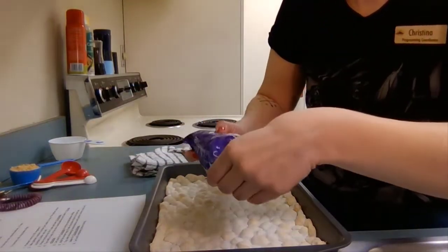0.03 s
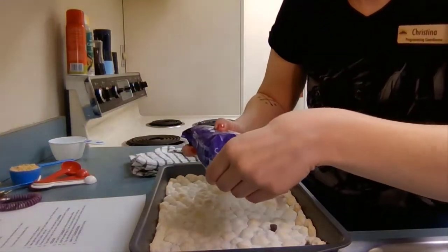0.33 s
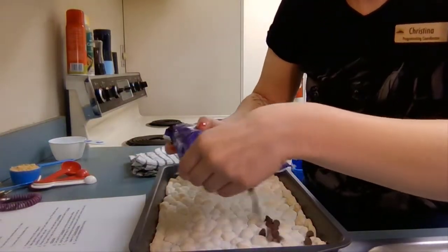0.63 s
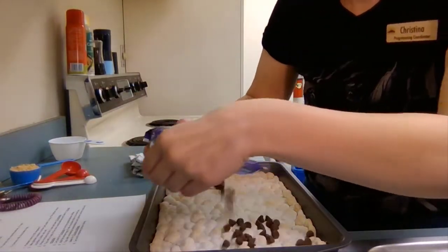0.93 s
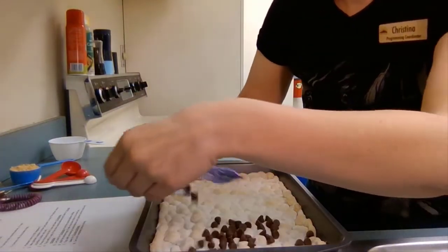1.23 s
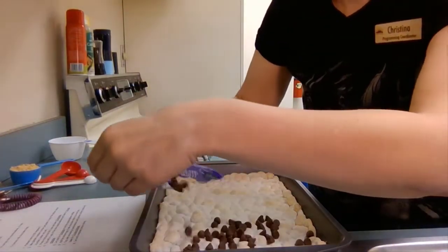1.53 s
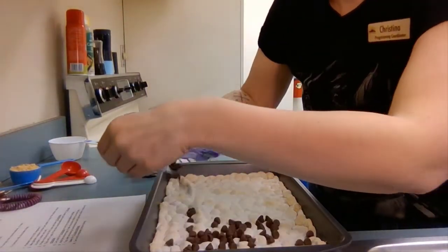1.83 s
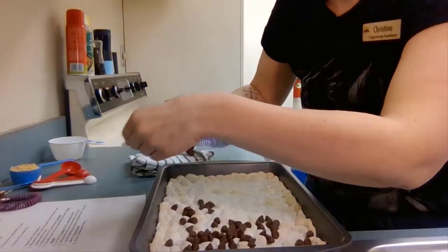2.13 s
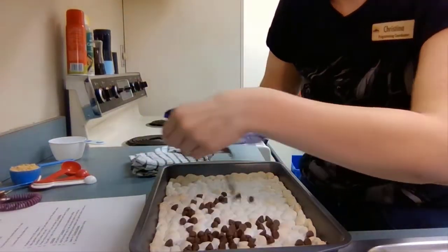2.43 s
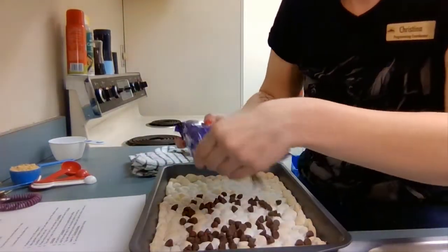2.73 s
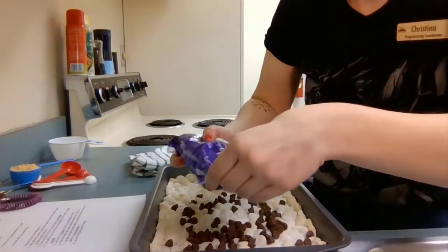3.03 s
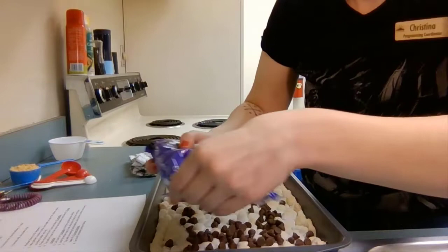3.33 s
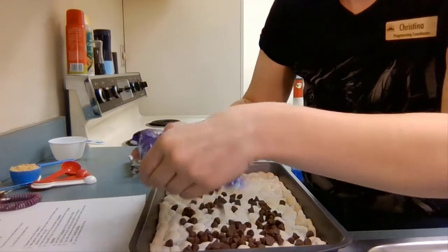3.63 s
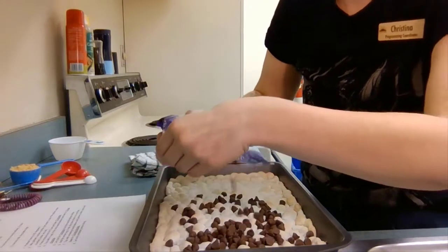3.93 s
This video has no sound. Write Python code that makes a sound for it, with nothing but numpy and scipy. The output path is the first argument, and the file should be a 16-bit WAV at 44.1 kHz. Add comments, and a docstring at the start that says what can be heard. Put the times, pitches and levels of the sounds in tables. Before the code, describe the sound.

Small chocolate chips tap dully onto food in a metal pan, with plastic bag crinkling.

```python
"""Chocolate chips, sprinkled by hand from a plastic bag, land on a metal pan of soft food. Each chip gives a
dull tap and a tick, and briefly rings the pan. The bag crackles sharply at first as its creases buckle, then
rustles faintly. Heard close up in a small kitchen, on a small microphone thin in the bass and the top. The
whole sound dips briefly now and then."""
import sys
import numpy as np
from scipy import signal
from scipy.fft import rfft, irfft
from scipy.io import wavfile
from scipy.ndimage import uniform_filter1d

SR = 44100
rng = np.random.default_rng(int(sys.argv[2]) if len(sys.argv) > 2 else 0)


def master_out(mix):
    """Clip the mix to full scale and print it as 16-bit PCM to the path in sys.argv[1]."""
    frames = np.transpose(np.atleast_2d(mix))
    ceiling = np.clip(frames, -1, 1)
    pcm = np.round(ceiling * 32767).astype(np.int16)
    wavfile.write(sys.argv[1], SR, pcm)


N = 176400
BAND_LIMIT_HZ = 9000


def amp(db):
    """Decibels to gain."""
    return 10 ** (np.asarray(db) / 20)


def unit_rms(x):
    """Scales to rms 1."""
    return x / np.sqrt(np.mean(x ** 2) + 1e-20)


def curve_at(points, hz):
    """Reads a table on a log-frequency axis."""
    points_hz, values = np.transpose(points)
    return np.interp(np.log(hz + 1), np.log(points_hz + 1), values)


def add(mix, start_s, sound):
    """Mixes a sound in at a time."""
    part = mix[round(start_s * SR):][:len(sound)]
    part += sound[:len(part)]


def colour(x, spectrum, size=4096):
    """Minimum-phase filter of unit energy with the given spectrum, falling above the band limit."""
    hz = np.fft.rfftfreq(size, 1 / SR)
    gain_db = curve_at(spectrum, hz) - 30 * np.clip(hz / BAND_LIMIT_HZ - 1, 0, 1)
    cepstrum = irfft(np.log(amp(gain_db)))
    causal = 2 * cepstrum * (np.arange(size) < size // 2)
    taps = irfft(np.exp(rfft(causal)))
    return signal.oaconvolve(x, taps / np.linalg.norm(taps))[:len(x)]


def ring(modes, t, scatter_db=2.5, detune=.012):
    """Dying modes, a little different in level and pitch each time."""
    sound = np.zeros(len(t))
    for hz, db, t60_s in modes:
        envelope = amp(db + scatter_db * rng.standard_normal() - 60 * t / t60_s)
        pitch_hz = hz * (1 + detune * rng.standard_normal())
        sound += envelope * np.sin(2 * np.pi * pitch_hz * t)
    return sound


def clicks(per_s, spread_db):
    """Random clicks of uneven size."""
    sizes = amp(spread_db * np.minimum(rng.exponential(1, N), 3.2))
    signs = rng.choice([-1., 1.], N)
    return unit_rms(sizes * signs * (rng.random(N) < per_s / SR))


# Relative levels of the bag and the handful as the hands move: time_s, crackle_db, rub_db
HAND_MOVES = [(0, -36.5, -37.5), (.06, -59, -54.5), (0.092, -45.5, -42), (0.119, -52.5, -39),
              (.16, -52, -55), (.21, -58, -40), (.25, -58, -53.5), (0.293, -47.5, -48.5),
              (0.344, -67.5, -52.5), (0.387, -68, -74), (0.437, -54, -50.5), (0.494, -74.5, -60.5),
              (0.545, -51.5, -42), (0.618, -64, -76), (.72, -65.5, -67.5), (0.952, -69, -59),
              (1.301, -75, -76), (1.421, -77, -67.5), (1.476, -63, -61), (1.484, -60, -56.5),
              (1.523, -55, -47.5), (1.58, -73.5, -67), (1.629, -75, -75), (1.677, -66.5, -65),
              (1.78, -87.5, -77.5), (1.91, -68.5, -63.5), (2.05, -73.5, -75), (2.13, -69, -62.5),
              (2.2, -84.5, -72), (2.309, -75.5, -65.5), (2.488, -63.5, -63.5), (2.65, -78.5, -66),
              (2.771, -76.5, -85.5), (3.05, -73, -62.5), (3.119, -77, -73), (3.191, -70, -64.5),
              (3.31, -82.5, -74.5), (3.632, -68.5, -62.5), (3.719, -74, -73), (3.781, -70, -61.5),
              (4, -73, -69)]
# Colours of the crackling film and the rubbing chips: frequency_hz, gain_db
CRACKLE_SPECTRUM = [(200, -21.5), (1000, 8), (1400, 5), (1850, -1.5), (2050, -2), (2450, 2.5), (3000, -3),
                    (4300, -1), (5000, -3), (5800, -2.5), (6700, 2.5), (8000, -10.5)]
RUB_SPECTRUM = [(30, -31.5), (60, -21.5), (105, -3), (150, -16.5), (230, -9), (290, -7), (375, 6),
                (480, -13.5), (620, -5.5), (760, 1), (880, -9), (1050, -4.5), (1400, -15), (3000, -36)]


def crackle_and_rub():
    """Small creases crackle in clumps and chips rub dully, following the hands."""
    time_s, crackle_db, rub_db = np.transpose(HAND_MOVES)
    t = np.arange(N) / SR
    flicker = unit_rms(uniform_filter1d(rng.standard_normal(N), round(.009 * SR)))
    clumps = unit_rms(amp(3 * flicker))
    crackle = colour(clumps * clicks(per_s=600, spread_db=3), CRACKLE_SPECTRUM)
    rub = colour(clumps * clicks(per_s=220, spread_db=4), RUB_SPECTRUM)
    crackle *= amp(np.interp(t, time_s, crackle_db) - 3.5)
    rub *= amp(np.interp(t, time_s, rub_db) + 2.5)
    return crackle, rub


# Modes of the hollow plastic bag: pitch_hz, level_db, t60_s
BAG_MODES = [(1834, -2.5, .05), (1900, -3.5, 0.039), (2304, -3, .03), (2633, -4, 0.014), (3472, -2.5, .03),
             (3634, -3.5, 0.043), (4270, 1.5, 0.015), (4742, -4.5, 0.034), (5520, -7, .02),
             (5933, -3.5, .018), (6530, -9, 0.023)]


def hollow_bag(cracks, bend_s=.2, ring_db=-4.5):
    """Every crack rings the hollow bag, whose modes wander as the hand bends it."""
    t, ringing = np.arange(N) / SR, np.zeros(N)
    for centre_s in np.arange(0, N / SR + bend_s, bend_s):
        response = ring(BAG_MODES, t[:SR // 10])
        crossfade = np.clip(1 - abs(t - centre_s) / bend_s, 0, 1)
        ringing += signal.oaconvolve(cracks * crossfade, response / np.linalg.norm(response))[:N]
    return cracks + amp(ring_db) * ringing


# Colour of the kitchen's background: frequency_hz, gain_db
ROOM_TONE_SPECTRUM = [(20, -25.5), (50, -11.5), (90, -7), (115, 6), (160, -3), (370, -4.5), (500, -13.5),
                      (730, 0), (1300, -23), (3000, -21.5), (6500, -24), (9000, -32.5)]


def room_tone():
    """Faint, low noise of the room behind the pan."""
    return amp(-73) * colour(rng.standard_normal(N), ROOM_TONE_SPECTRUM)


# Single creases of the bag snapping: start_s, level_db, pitch_hz, settle_s
CREASES = [(.0095, -25, 5770, 0.0058), (0.0158, -29.5, 1790, 0.017), (0.0647, -46.5, 1830, 0.003),
           (0.0786, -18, 2300, 0.025), (0.0947, -6.5, 4400, 0.0028), (0.0972, -16, 2040, 0.0039),
           (0.1034, -20.5, 1770, 0.009), (0.1453, -30, 1900, 0.0063), (0.1666, -44, 1860, 0.0095),
           (0.1933, -28, 2840, 0.01), (0.199, -20.5, 3640, 0.0046), (0.2342, -29, 1990, 0.0034),
           (0.2898, -38, 1897, 0.0088), (0.3315, -38.5, 1940, 0.0056), (0.503, -33, 6140, 0.024),
           (0.5254, -36, 4300, 0.0096), (0.5444, -38, 2850, 0.011), (0.5533, -32, 2500, 0.0049),
           (0.97, -52, 2450, 0.0091), (1.044, -42, 1920, 0.008), (1.0528, -39.5, 4240, 0.026),
           (1.1743, -59.5, 1906, 0.021), (1.4784, -35.5, 5480, 0.011), (1.4864, -32, 5780, 0.0051),
           (1.604, -38, 2380, 0.0008), (1.626, -52, 2070, 0.0076), (1.8746, -51.5, 1830, 0.015),
           (2.0114, -54, 4680, 0.011), (2.0812, -54, 1730, .003), (2.368, -46.5, 4980, 0.0069),
           (2.4012, -48.5, 2120, 0.017), (2.4468, -50, 2340, 0.0097), (2.4523, -45, 2300, 0.0058),
           (2.495, -42.5, 5700, 0.012), (2.5073, -42.5, 2330, 0.0086), (2.5614, -44.5, 2420, 0.0091),
           (2.577, -54, 2170, 0.0093), (2.6157, -49, 2550, 0.0055), (3.039, -45.5, 6490, 0.013),
           (3.1515, -46, 6070, 0.014), (3.167, -45, 5730, 0.017), (3.289, -56.5, 1980, 0.013),
           (3.3543, -54, 5870, 0.0088), (3.509, -49.5, 2750, 0.013), (3.5302, -49, 2410, 0.018),
           (3.5818, -53.5, 2520, 0.0064), (3.6332, -47, 3100, 0.022), (3.7701, -47.5, 4220, 0.013),
           (3.861, -53.5, 4200, 0.0021)]
# Colour of their cracks: frequency_hz, gain_db
CRACK_SPECTRUM = [(80, -33), (300, -4), (950, -3), (1300, -9.5), (1830, -1.5), (2100, -3.5), (3000, -3),
                  (4400, 0), (5050, 0), (5800, 0.5), (6700, 0), (8000, -1)]


def crease_snaps(snap_s=.0014, buckle_s=.0005):
    """A crease buckles with a crack and a very short ring, then the film settles."""
    t, cracks, rings = np.arange(SR // 10) / SR, np.zeros(N), np.zeros(N)
    buckle = t / buckle_s
    for start_s, level_db, pitch_hz, settle_s in CREASES:
        decay = np.exp(-t / snap_s) + amp(-6) * np.exp(-t / settle_s)
        crack = (1 - np.exp(-buckle)) * decay * rng.standard_normal(len(t))
        ping = buckle * np.exp(1 - buckle) * np.sin(2 * np.pi * pitch_hz * t)
        add(cracks, start_s, amp(level_db - 14) * crack)
        add(rings, start_s + buckle_s, amp(level_db - 9.5) * ping)
    return colour(cracks, CRACK_SPECTRUM) + rings


# Chips landing near the microphone, levels relative within each column:
# start_s, tap_db, pitch_hz, swell_s, low_ring_db, tick_db
LANDINGS = [(.015, -45, 640, 0.0015, -35, -46), (.03, -36.5, 564, 0.0041, -58.5, -55),
            (.0935, -24.5, 796, 0.0027, -26, -30.5), (.108, -25, 723, 0.0038, -37, -31.5),
            (.169, -38, 790, 0.0016, -31.5, -38.5), (.204, -30.5, 792, 0.0034, -43, -37),
            (.2595, -29, 768, 0.0031, -34.5, -41), (.277, -30, 670, 0.0017, -55, -41),
            (.331, -41.5, 560, 0.00094, -43.5, -44), (.428, -51, 740, 0.0021, -46.5, -57),
            (.438, -39, 770, 0.0021, -48.5, -70), (.449, -43, 764, 0.0026, -54, -66),
            (.465, -36.5, 770, 0.001, -62.5, -57), (.536, -25, 759, 0.0013, -45, -36),
            (.585, -34.5, 795, 0.00072, -73, -52.5), (.6255, -33, 760, 0.0022, -52, -50.5),
            (.692, -44.5, 996, 0.00094, -48.5, -57), (.7425, -25, 770, 0.00047, -43, -50.5),
            (.748, -32.5, 760, 0.0018, -57, -45.5), (.761, -42.5, 743, 0.0033, -81, -63),
            (.785, -42, 788, 0.0014, -55, -66), (.977, -44, 732, 0.0016, -62, -75),
            (1.0505, -39, 730, 0.0016, -48.5, -55.5), (1.1905, -50, 692, .002, -74, -72),
            (1.205, -49, 730, 0.0022, -72, -80.5), (1.3665, -49, 690, .0012, -68, -65.5),
            (1.443, -59.5, 785, 0.0035, -51, -62), (1.4865, -40, 785, 0.0045, -64.5, -49),
            (1.5103, -31, 740, .0014, -57, -70), (1.59, -46.5, 720, 0.0023, -67, -68.5),
            (1.6042, -34.5, 744, 0.0012, -56, -59), (1.691, -52.5, 673, 0.0034, -68.5, -70),
            (1.8165, -57, 655, .0025, -69, -67), (1.875, -56, 680, 0.0019, -69.5, -63.5),
            (1.915, -57, 635, 0.0023, -56.5, -72.5), (2.014, -54, 695, .0014, -59.5, -82.5),
            (2.043, -57, 733, 0.0022, -68, -75), (2.0812, -47.5, 695, 0.00081, -62, -67.5),
            (2.105, -61, 719, 0.0024, -51, -63.5), (2.249, -63, 800, 0.0029, -61.5, -61),
            (2.369, -48.5, 807, 0.0034, -47, -64), (2.398, -54, 735, .0025, -49.5, -64),
            (2.4555, -39, 1060, 0.00087, -72, -50), (2.576, -46, 780, .0012, -45.5, -53),
            (2.582, -52.5, 760, 0.00071, -60.5, -77), (2.6157, -39, 825, 0.00038, -53, -48.5),
            (2.6335, -46.5, 788, 0.0041, -59, -66), (2.7397, -58.5, 730, .0014, -83.5, -81),
            (2.825, -47.5, 766, 0.00094, -63.5, -75), (2.842, -49, 753, .002, -69, -60),
            (2.9325, -57.5, 716, .0025, -85.5, -82), (2.948, -54.5, 750, 0.0027, -71, -75),
            (2.9845, -51.5, 820, 0.0011, -71, -64), (3.097, -53.5, 763, 0.0016, -65.5, -81.5),
            (3.286, -54, 777, 0.0036, -81.5, -68.5), (3.335, -43, 750, .0018, -57, -81),
            (3.3545, -63.5, 733, .0025, -72.5, -79), (3.4063, -44.5, 730, 0.0018, -59.5, -69),
            (3.4988, -54, 720, .0025, -54.5, -74), (3.532, -46, 754, 0.0019, -65, -66),
            (3.606, -59, 733, 0.0026, -66, -63.5), (3.632, -45.5, 777, 0.0041, -72, -73),
            (3.646, -50.5, 770, .0025, -55.5, -57), (3.7455, -48, 780, 0.00075, -60, -60.5),
            (3.862, -50, 688, 0.00075, -53.5, -64), (3.8937, -46, 768, .0017, -46.5, -61)]
# Low and high modes of the loaded pan: pitch_hz, level_db, t60_s
PAN_LOW_MODES = [(226.2, -9.5, 0.055), (309.2, -3.5, 0.075), (345, -6.5, .017), (382.3, 0.5, 0.088),
                 (378, -10, 0.12)]
PAN_HIGH_MODES = [(647, -22.5, 0.19), (646, -21.5, .033), (735, -13.5, 0.068), (769.5, -17.5, 0.11),
                  (870, -23, .14), (945, -21.5, 0.16), (1060, -22, .11), (1815, -35, 0.19),
                  (1932, -35, .22)]
# Colour of a chip's tick: frequency_hz, gain_db
TICK_SPECTRUM = [(300, -6.5), (1100, 2), (1600, -2), (1850, 3.5), (2050, -4.5), (2500, 6.5), (3000, -4),
                 (4300, -6.5), (6500, -12.5), (8000, -30)]


def chips_on_pan(high_rise_s=.0083, low_rise_s=.005, tick_rise_s=.0003, tick_decay_s=.0014):
    """Each chip gives a damped tap and a tick, and rings the pan beneath the food."""
    t, body, ticks = np.arange(SR // 4) / SR, np.zeros(N), np.zeros(N)
    tick_envelope = (1 - np.exp(-t / tick_rise_s)) * np.exp(-t / tick_decay_s)
    for start_s, tap_db, pitch_hz, swell_s, low_ring_db, tick_db in LANDINGS:
        tap = np.sin(2 * np.pi * pitch_hz * t) * t / swell_s * np.exp(1 - t / swell_s)
        high_ring = (1 - np.exp(-t / high_rise_s)) * ring(PAN_HIGH_MODES, t)
        low_ring = (1 - np.exp(-t / low_rise_s)) * ring(PAN_LOW_MODES, t)
        add(body, start_s + .00012, -amp(tap_db) * (tap + amp(-6) * high_ring))
        add(body, start_s, amp(low_ring_db + 2.5) * low_ring)
        add(ticks, start_s, amp(tick_db + 7.5) * tick_envelope * rng.standard_normal(len(t)))
    return body + colour(ticks, TICK_SPECTRUM)


# Decay of the small kitchen: frequency_hz, t60_s
KITCHEN_DECAY = [(200, 0.27), (550, 0.24), (1400, 0.19), (4000, 0.26), (8000, 0.13)]
# Echoes from the nearby counter and wall: delay_s, gain
NEAR_ECHOES = [(.0021, 0.21), (.0062, 0.24), (.0094, 0.059), (.0135, 0.0073), (.0205, 0.0088)]


def kitchen(source, tail_db):
    """Direct sound from close by, a few near echoes and a short diffuse tail."""
    hz, t, noise = signal.stft(rng.standard_normal(SR // 2), SR, nperseg=256)
    decay = amp(-60 * t / curve_at(KITCHEN_DECAY, hz)[:, None])
    build_up = np.minimum(t / .008, 1)
    _, tail = signal.istft(noise * decay * build_up, SR, nperseg=256)
    response = amp(tail_db) * tail / np.linalg.norm(tail)
    direct = (.00059, .97)  # about 20 cm of air
    for delay_s, gain in [direct, *NEAR_ECHOES]:
        add(response, delay_s, np.array([gain]))
    return signal.oaconvolve(source, response)[:N]


# Brief dips of the whole sound: start_s, end_s, depth_db
LEVEL_DIPS = [(1.006, 1.025, -21.5), (1.082, 1.166, -27.5), (1.329, 1.36, -25), (1.528, 1.582, -27.5),
              (1.654, 1.683, -30), (1.944, 2.006, -27), (2.2, 2.229, -27), (2.323, 2.355, -24),
              (2.679, 2.736, -28.5), (2.901, 2.923, -22), (3.224, 3.279, -23.5), (3.798, 3.829, -20.5)]


def dip_gain(edge_s=.012):
    """The level dips briefly, with soft edges."""
    t, gain_db = np.arange(N) / SR, np.zeros(N)
    for start_s, end_s, depth_db in LEVEL_DIPS:
        inside_s = np.minimum(t - start_s, end_s - t)
        gain_db += depth_db * np.clip(.5 + inside_s / edge_s, 0, 1)
    return amp(gain_db)


def scene():
    """Chips, bag and room tone in the kitchen, over a faint steady hiss."""
    crackle, rub = crackle_and_rub()
    background = room_tone()
    pan = kitchen(chips_on_pan(), tail_db=-7)
    bag = kitchen(hollow_bag(crease_snaps() + crackle) + rub, tail_db=-12.5)
    hiss = amp(-90) * rng.standard_normal(N)
    return ((pan + bag + background) * dip_gain() + hiss)[None]


# Response of the small microphone: frequency_hz, gain_db
MIC_RESPONSE = [(20, -32), (45, -23), (85, -1), (115, -3.5), (160, -2), (230, 1.5), (700, -1.5),
                (1600, -0.5), (6500, 3.5), (7550, -2), (7850, -20.5), (9000, -16.5)]


def record(dry):
    """A small microphone, thin in the bass and the top, then the band limit."""
    picked_up = amp(-4.5) * colour(dry[0], MIC_RESPONSE)
    lowpass = signal.firwin(161, BAND_LIMIT_HZ, window=("kaiser", 7), fs=SR)
    return signal.oaconvolve(picked_up, lowpass, "same")[None]


dry = scene()
out = record(dry)
master_out(out)
```